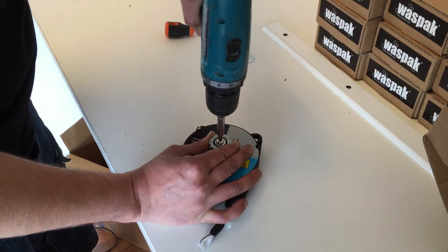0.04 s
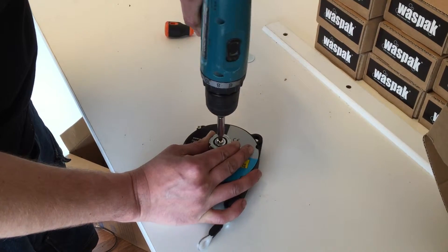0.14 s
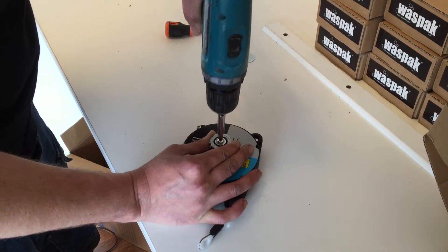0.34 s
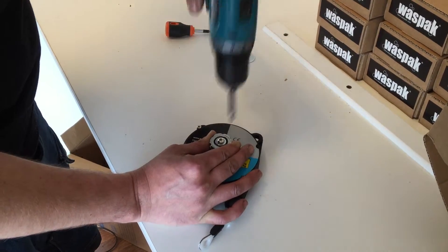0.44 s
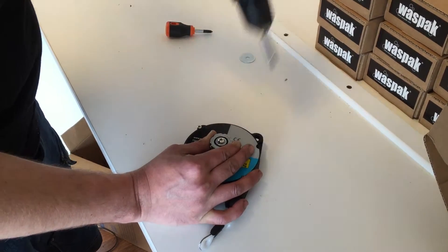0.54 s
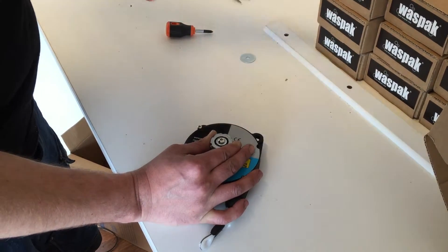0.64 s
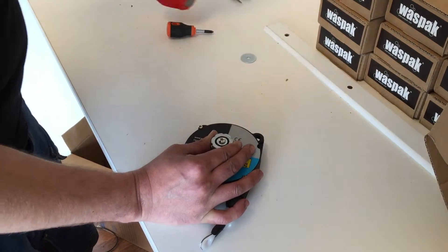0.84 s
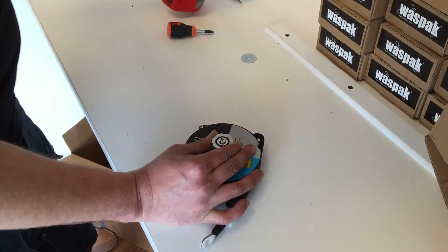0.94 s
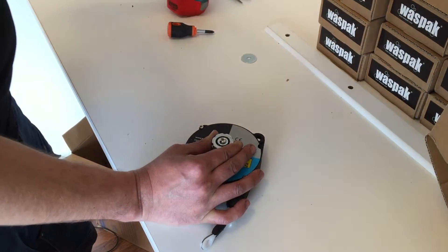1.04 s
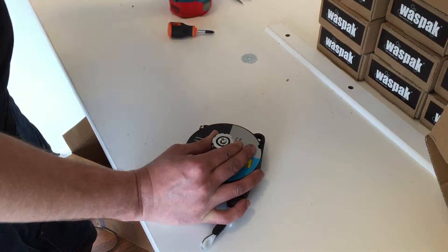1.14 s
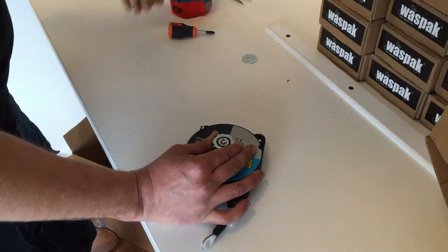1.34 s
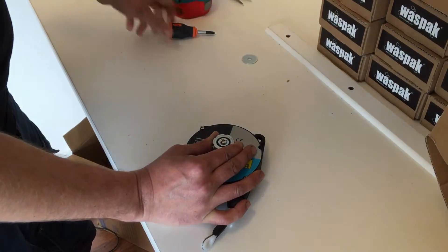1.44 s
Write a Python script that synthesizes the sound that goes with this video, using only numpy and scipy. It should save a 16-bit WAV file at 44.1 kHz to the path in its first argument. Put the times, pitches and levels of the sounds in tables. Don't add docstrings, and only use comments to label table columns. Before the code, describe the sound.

A cordless drill whirs briefly, its clutch ratchets loudly, then it is set down on a bench

```python
import sys
import numpy as np
from scipy import signal
from scipy.fft import rfft, irfft
from scipy.io import wavfile

SR = 44100
rng = np.random.default_rng(int(sys.argv[2]) if len(sys.argv) > 2 else 0)


def persist_wave(psi):
    counts = np.round(np.clip(psi, -1, 1) * 32767).astype(np.int16)
    wavfile.write(sys.argv[1], SR, np.atleast_2d(counts).T)


def undo_db(level):
    steps = np.asarray(level, float) / 20
    return 10 ** steps


N = 66150

# (frequency [Hz], level per Hz [dB])
SNAP_COLOUR = [(180, -39), (300, -6), (455, 1), (603, -16.5), (1390, -1), (2400, -7), (2650, -12),
               (5000, -13), (6100, -14), (16000, -18)]
# (time [s], peak level [dB], bench shake level [dB], contact cut of the shake [Hz])
CLUTCH_SLIPS = [
    (0.2086, -11.5, -6.5, 802.5),
    (0.2300, -2, -20, 500),
    (0.2494, -4, -17, 303),
    (0.2695, -4, -13, 150.6),
    (0.2887, -5.5, -11.5, 111),
    (0.308, -4, -9.5, 114),
    (.329, -6, -20, 109.5),
    (.3640, -9.5, -26, 200),
]


def rms_one(x):
    return x / np.sqrt(np.mean(x ** 2) + 1e-24)


def at_hz(points, hz):
    p = np.array(points)
    return np.interp(np.log(hz), np.log(p[:, 0]), p[:, 1])


def butter(x, order, hz, kind="low"):
    return signal.sosfilt(signal.butter(order, hz, kind, fs=SR, output="sos"), x)


def colour(x, spectrum, peaks_db=-60):
    # (frequency [Hz], width [Hz], level [dB])
    housing = [(1380, 390, -2.5), (2120, 90, -8), (2500, 62, 1), (3040, 120, -4.5), (3330, 120, -8.5),
               (3800, 250, -7.5), (4260, 83, -5), (6310, 250, -4), (9150, 95, -17), (13400, 130, -11),
               (13800, 170, -11.5), (14900, 150, -16.5)]
    size = 4096
    hz = np.maximum(np.arange(size // 2 + 1) * SR / size, 5)
    peaks = 0
    for f, width, db in housing:
        peaks = peaks + undo_db(db - at_hz(SNAP_COLOUR, f)) / np.sqrt(1 + (2 * (hz - f) / width) ** 2)
    gain = undo_db(at_hz(spectrum, hz)) * (1 + undo_db(peaks_db) * peaks)
    cepstrum = irfft(np.log(gain))
    cepstrum = np.concatenate([cepstrum[:1], 2 * cepstrum[1:size // 2], np.zeros(size // 2)])
    h = irfft(np.exp(rfft(cepstrum)))
    return signal.oaconvolve(x, h / np.sqrt(np.sum(h ** 2)))[:N]


def ring(clicks, hz, t60):
    r, w = undo_db(-60 / (t60 * SR)), 2 * np.pi * hz / SR
    return signal.lfilter([0, np.sin(w)], [1, -2 * r * np.cos(w), r * r], clicks + 1e-18)


def burst(s, hold, tail):
    t = np.arange(N) / SR - s
    return (t >= 0) * np.exp(-np.maximum(t - hold, 0) / tail)


def push(s, db, cut_hz):
    x, r = np.zeros(N), np.exp(-2 * np.pi * cut_hz / SR)
    x[min(int(s * SR), N - 1)] = undo_db(db)
    return signal.lfilter([(1 - r) ** 2], [1, -2 * r, r * r], x + 1e-18)


def grains(per_s, spread_db):
    size = undo_db(spread_db * np.minimum(rng.exponential(1, N), 5)) * rng.choice([-1, 1], N)
    return rms_one(size * (rng.random(N) < per_s / SR))


def floor():
    # (frequency [Hz], level per Hz [dB])
    air_colour = [(18, -32.5), (30, -6.5), (98, -4), (404, -15.5), (584, -25), (2480, -25), (4910, -32),
                  (11700, -38), (16000, -43)]
    air_db, hum_db, hum_hz, hum_width_hz = -64, -61.5, 93, 15
    air = colour(rng.standard_normal(N), air_colour)
    hum = rms_one(ring(rng.standard_normal(N), hum_hz, 2.2 / hum_width_hz))
    return undo_db(air_db) * air + undo_db(hum_db) * hum


def workshop(x):
    # (frequency [Hz], t60 [s])
    room_decay = [(60, 0.55), (250, 0.4), (1000, 0.33), (4000, .33), (12000, 0.26)]
    level_db, build_up_s = -16.5, 0.004
    t, h = np.arange(SR // 2) / SR, 0
    for hz in 45 * 2. ** np.arange(9):
        band = butter(rng.standard_normal(len(t)), 2, [hz / np.sqrt(2), hz * np.sqrt(2)], "band")
        h = h + band * undo_db(-60 * t / at_hz(room_decay, hz))
    h = h * (1 - np.exp(-t / build_up_s))
    return undo_db(level_db) * signal.fftconvolve(x, h / np.sqrt(np.sum(h ** 2)))[:N]


def ticks():
    # (time [s], level [dB], pitch [Hz], length [s])
    touches = [(.004, -57, 1800, 0.023), (.004, -65, 12400, 0.021), (0.024, -42.5, 2840, 0.0097),
               (.508, -63, 12650, 0.0024), (0.511, -48.5, 2605, 0.017), (0.516, -50.5, 5960, 0.0065),
               (0.5161, -60, 10950, 0.004), (.625, -71, 8200, .002), (0.731, -61.5, 900, 0.0091),
               (0.732, -55.5, 2863, 0.0068), (0.744, -57, 450, 0.03), (0.736, -54, 166, 0.049),
               (1.166, -53.5, 11030, 0.018), (1.349, -63.5, 11900, .002), (0.797, -56, 1468, .01),
               (.8669, -51.5, 2900, 0.007), (0.8675, -56.5, 9530, .005), (1.125, -64, 2006, 0.069),
               (1.311, -44.5, 3730, 0.014), (1.33, -71, 9000, .004), (1.455, -58, 8570, 0.003),
               (1.444, -62, 1093, 0.031)]
    # (frequency [Hz], level [dB])
    shell_modes = [(980, -3), (1520, -4), (2400, -3), (2950, -7), (3600, -5.5)]
    # (time [s], frequency [Hz], level [dB], t60 [s])
    pings = [(0.518, 964, -70, .12), (.517, 2400, -79, 0.033), (0.519, 5730, -64.5, .007),
             (0.661, 4000, -81, 0.0063), (0.662, 6570, -86, .006), (.687, 2840, -74, .008),
             (.732, 999, -72.5, .05), (0.734, 2473, -73, .012), (0.8005, 937, -75, .03),
             (.7995, 3900, -85, .006), (0.7989, 7240, -85, .006), (0.8674, 1077, -80, 0.085),
             (0.8681, 1498, -69, 0.031), (0.867, 3580, -83, .015), (.8673, 6870, -74, 0.0073)]
    shell_db, shell_t60_s = -30, 0.016
    rough, rubs = grains(16000, 2.1), np.zeros(N)
    for s, db, hz, long in touches:
        band = butter(rough * burst(s, long / 2, long), 2, [hz / 2.2, min(hz * 1.44, .45 * SR)], "band")
        rubs += undo_db(db) * band * np.sqrt(SR / 4 / hz)
    shell = sum(undo_db(shell_db + db) * ring(rubs, hz, shell_t60_s) for hz, db in shell_modes)
    parts = sum(undo_db(db) * ring(rough * burst(s, 0.0018, 0.003), hz, t60) for s, hz, db, t60 in pings)
    return undo_db(-0.5) * rubs + shell + parts


def bench(blow, column, damp=0.98):
    # (frequency [Hz], t60 [s], level under the clutch [dB], under the heel [dB], under the toe [dB])
    modes = [(56, 0.19, -5.5, -18, -16), (74.4, 0.17, -6, -37, -33), (130, 0.22, -12.5, -9.5, -2),
             (145, 0.12, -9, -1, -1), (171.8, 0.14, 1, -27, -4.5), (212.3, 0.13, -3.5, -10, -24),
             (233, 0.13, -10.5, -4, -7), (310.7, 0.18, -10, -2, -4.5), (388, 0.062, -14.5, -9.5, -10),
             (450, .09, -7, -4, -12), (562, .07, -21, -10.5, -48), (690, .06, -13, -20, -18),
             (1000.4, 0.14, -4.5, -12, -39), (1450, .04, -13, -7.5, -36)]
    signs = (-1) ** np.arange(len(modes))
    return sum(k * undo_db(row[column]) * ring(blow, row[0], row[1] * damp) for k, row in zip(signs, modes))


def jingle():
    # (frequency [Hz], level [dB], t60 [s])
    chuck_modes = [(7620, -59, 0.013), (8370, -62, 0.0093), (12340, -64.5, 0.0043), (15100, -59, 0.003)]
    start_s, hold_s, tail_s, hits_per_s = 1.165, 0.009, 0.021, 1000
    out = np.zeros(N)
    for hz, db, t60 in chuck_modes:
        hits = grains(hits_per_s, 2.9) * burst(start_s, hold_s, tail_s)
        out = out + undo_db(db - 7.0) * ring(hits, hz, t60)
    return out


def knocks():
    # (time [s], thud level [dB], contact cut [Hz], crack level [dB], side [0 heel, 1 toe])
    landings = [(1.1508, -23, 2500, -24, 0), (1.1555, -22.5, 1190, -28.5, 0), (1.164, -22.5, 600, -46, 0),
                (1.171, -24, 504, -51, 0), (1.183, -29.5, 403, -53, 0), (1.3121, -39, 2020, -39, 1),
                (1.3168, -23.5, 504, -44, 1), (1.327, -36, 394, -57, 1), (1.345, -30.5, 493, -58, 1),
                (1.456, -40, 391, -60.5, 1), (1.468, -40, 900, -64, 0), (1.478, -34.5, 501, -67.5, 1),
                (1.488, -52, 400, -64.5, 1), (1.4978, -41, 900, -53, 0)]
    # (frequency [Hz], level per Hz [dB])
    crack_colour = [(300, -12), (500, -2.5), (1200, -14.5), (2300, -12.5), (3700, -24), (4800, -32),
                    (16000, -48)]
    # (frequency [Hz], level under the heel [dB], under the toe [dB], t60 [s])
    foot_modes = [(774, -32, -31, 0.034), (861, -48, -42, 0.014), (1070, -32, -32, 0.0098),
                  (1195, -23.5, -48, 0.024), (1743, -19, -22, 0.016), (2166, -33, -31, 0.023),
                  (2265, -44, -24, 0.016)]
    crack_s, tail_s, tail_db, toe_crack_db = 0.0022, 0.025, -13.5, -4
    heel_damp, toe_damp = 0.48, 0.42
    heel, toe, heel_crack, toe_crack = np.zeros((4, N))
    for s, thud_db, cut_hz, crack_db, side in landings:
        crack = undo_db(crack_db) * (burst(s, 0, crack_s) + undo_db(tail_db) * burst(s, 0, tail_s))
        if side < .5:
            heel += push(s, thud_db + 6.0, cut_hz)
            heel_crack += crack
        else:
            toe += push(s, thud_db + 9, cut_hz)
            toe_crack += crack
    grit = rng.standard_normal(N)
    heel_crack, toe_crack = grit * heel_crack, grit * toe_crack
    thud = bench(heel, column=3, damp=heel_damp) - bench(toe, column=4, damp=toe_damp)
    cracks = colour(heel_crack + undo_db(toe_crack_db) * toe_crack, crack_colour)
    foot = sum(ring(undo_db(heel_db) * heel_crack + undo_db(toe_db) * toe_crack, hz, t60)
               for hz, heel_db, toe_db, t60 in foot_modes)
    return thud + cracks + foot + jingle()


def coast():
    level_db, start_s, tail_s, low_cut_hz = -49, .368, 0.027, 4000
    hiss = butter(rng.standard_normal(N), 2, low_cut_hz, "high")
    return undo_db(level_db) * burst(start_s, 0, tail_s) * hiss


def strain():
    level_db, pitch_hz = -33.5, 600
    start_s, hold_s, tail_s = .215, 0.17, 0.029
    grind = rms_one(butter(grains(4000, 4.7), 2, [pitch_hz / 1.8, pitch_hz * 2.2], "band"))
    return undo_db(level_db) * burst(start_s, hold_s, tail_s) * grind


def motor():
    # (time [s], whir level [dB], armature turns [Hz], hum level over the whir [dB])
    effort = [(0.021, -73.5, 117.7, -20.5), (0.026, -44, 150.7, -20), (0.06, -33.5, 239.2, -18.5),
              (0.11, -31.5, 283.7, -13), (0.141, -31.5, 288.3, -5), (0.165, -32, 294.2, 5),
              (0.18, -33, 291, 0), (0.194, -34, 285, -12), (0.229, -21.5, 279.4, -15),
              (0.36, -29.5, 252.8, -15), (0.41, -44.5, 120.5, -28)]
    # (multiple of the turns [1], level [dB])
    orders = [(1, 0), (3, -10), (4, -8.5), (5, -14.5)]
    # (frequency [Hz], level per Hz [dB])
    gear_colour = [(35, -46), (60, -16.5), (323, 0), (579, -10.5), (1380, -8), (4640, -18.5), (7940, -21.5),
                   (13300, -25), (16000, -29)]
    # (frequency [Hz], level [dB], t60 [s])
    shell_song = [(210, -57, .06), (454, -58, 0.066), (840, -53, 0.064), (1140, -48.5, 0.044),
                  (1410, -49, 0.059), (1790, -49.5, 0.044), (2120, -47, .05), (4250, -42, 0.032),
                  (4580, -41.5, .04), (6540, -39.5, .04)]
    teeth_per_s, tooth_spread_db, brush_depth, housing_db = 12000, 1, 0.11, -15.5
    mesh_order, mesh_db = 8.52, -10
    rumble_hz, rumble_db = 65, -8
    stop_s, fade_s = 0.433, 0.027
    s, whir_db, turns_hz, hum_db = np.transpose(effort)
    t = np.arange(N) / SR
    turn = 2 * np.pi * np.cumsum(np.interp(t, s, turns_hz)) / SR
    teeth = grains(teeth_per_s, tooth_spread_db) * (1 + brush_depth * np.cos(turn))
    rattle = colour(teeth, gear_colour, housing_db)
    rattle = rattle + sum(undo_db(db) * ring(rattle, hz, t60) for hz, db, t60 in shell_song)
    mesh = undo_db(mesh_db) * np.sin(mesh_order * turn)
    hum = sum(undo_db(db) * np.sin(round(k) * turn + 2 * np.pi * rng.random()) for k, db in orders)
    rumble = undo_db(rumble_db) * rms_one(ring(rng.standard_normal(N), rumble_hz, .08))
    whir = rattle + mesh + undo_db(np.interp(t, s, hum_db)) * (hum + rumble)
    return undo_db(np.interp(t, s, whir_db)) * whir * np.clip((stop_s - t) / fade_s, 0, 1)


def clutch():
    favoured_hz = [2400, 1440, 6070, 4090, 1960, 2560, 6100, 1640]
    # (time [s], peak level [dB], top of their colour [Hz])
    rebounds = [(0.2134, -13.5, 6960), (0.2328, -8, 3000), (0.2417, -9.5, 14000), (0.2574, -16.5, 3500),
                (.2615, -15.5, 7050), (0.2757, -15.5, 3025), (0.28, -15, 8100), (0.294, -18.5, 4000),
                (0.2997, -17.5, 6000), (0.3133, -13, 3000), (.3205, -18.5, 7000), (0.3367, -8, 2200),
                (0.344, -18.5, 5000), (.3765, -37, 9000)]
    slip_db, snap_s, snap_tail_s, housing_db = -8, 0.0027, 0.0012, -2
    chatter_db, chatter_s = -12.5, 0.015
    edge_hz, body_db = 2700, -5.5
    favour_db, favour_t60_s = -20, 0.01
    jolt_lag_s = .0015
    balls = grains(25000, 0.69)
    loose = colour(grains(15000, 0.83), SNAP_COLOUR, housing_db)

    snaps = [undo_db(db + slip_db) * burst(s, snap_s, snap_tail_s) * balls for s, db, _, _ in CLUTCH_SLIPS]
    sharp = colour(sum(snaps), SNAP_COLOUR, housing_db)
    snap = butter(sharp, 1, edge_hz, "high") + undo_db(body_db) * sharp
    favoured = sum(undo_db(favour_db) * ring(x, hz, favour_t60_s) for x, hz in zip(snaps, favoured_hz))

    after = sum(undo_db(db + slip_db + chatter_db) * burst(s, 0, chatter_s) for s, db, _, _ in CLUTCH_SLIPS)
    chatter = butter(colour(after * grains(15000, 2.5), SNAP_COLOUR, housing_db), 1, 6000)
    late = 0
    for s, db, top_hz in rebounds:
        rebound = undo_db(db + slip_db + 2) * burst(s, snap_s * 0.89, snap_tail_s) * loose
        late = late + butter(rebound, 2, top_hz)

    jolt = sum(push(s + jolt_lag_s, db, cut_hz) for s, _, db, cut_hz in CLUTCH_SLIPS)
    seat = ring(push(.2035, -17, 3700), 900, 0.029)
    return snap + undo_db(5.0) * chatter + favoured + late + seat + bench(jolt, column=2)


def scene():
    near = ticks() + knocks() + coast() + strain() + motor() + clutch()
    return (near + workshop(near) + floor())[None]


def top_cut(x):
    return signal.sosfilt(signal.butter(12, 16440, fs=SR, output="sos"), x)


def record(dry):
    low_cut_hz, high_cut_hz, ceiling = 45, 16500, .72
    x = butter(dry, 4, low_cut_hz, "high")
    x = ceiling * np.tanh(x / ceiling)
    x = signal.sosfilt(signal.cheby2(12, 60, high_cut_hz, fs=SR, output="sos"), x)
    return top_cut(x)


dry = scene()
out = record(dry)
persist_wave(out)
```